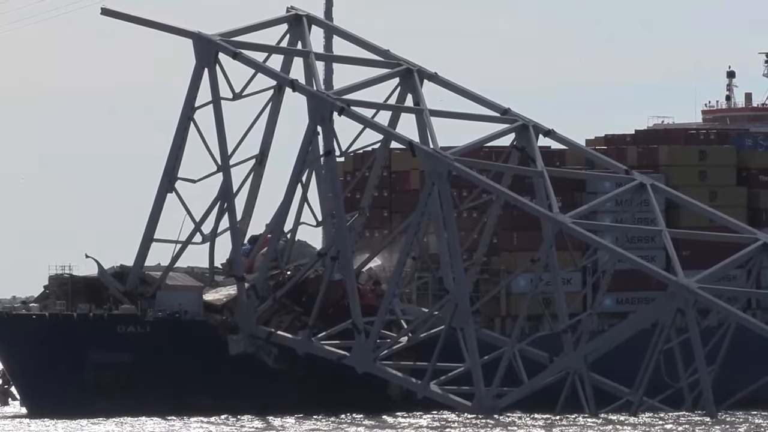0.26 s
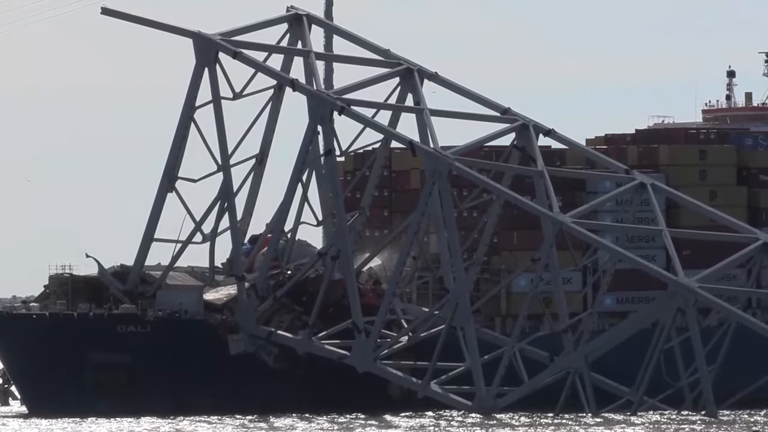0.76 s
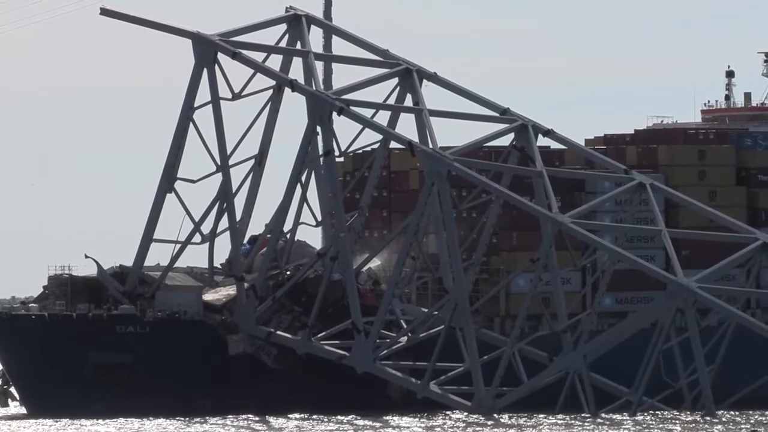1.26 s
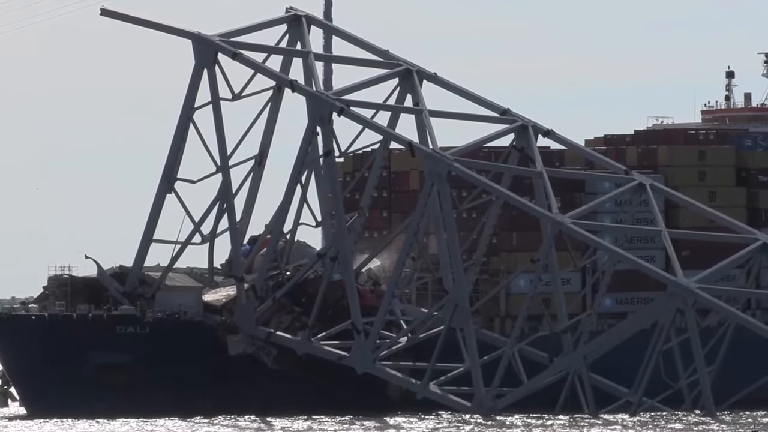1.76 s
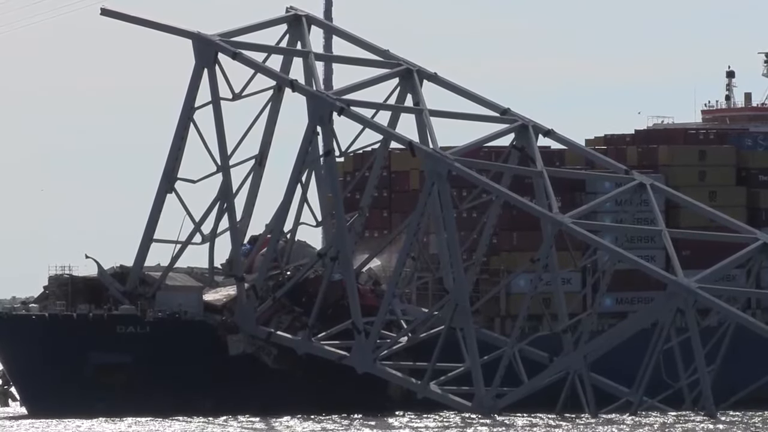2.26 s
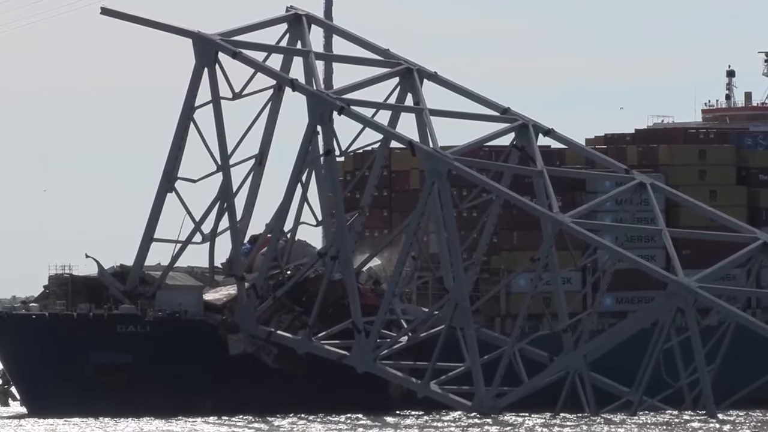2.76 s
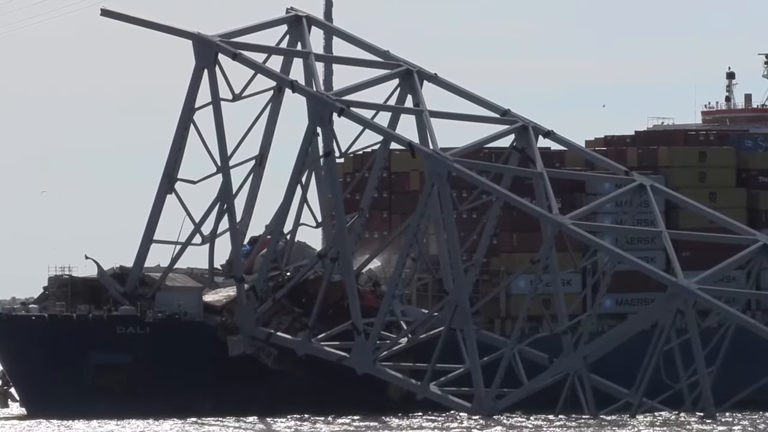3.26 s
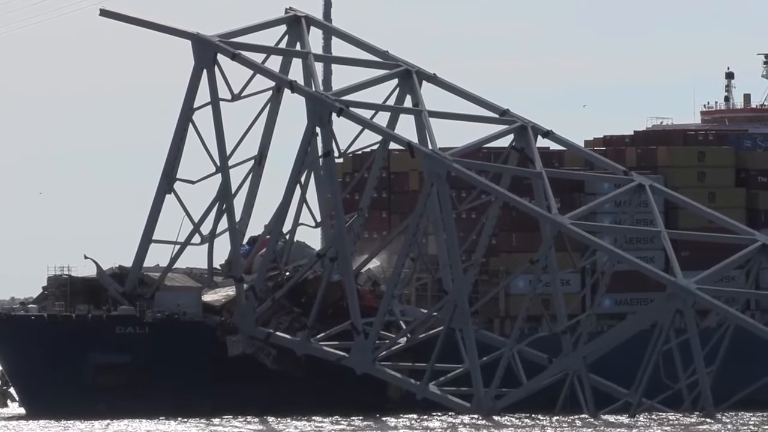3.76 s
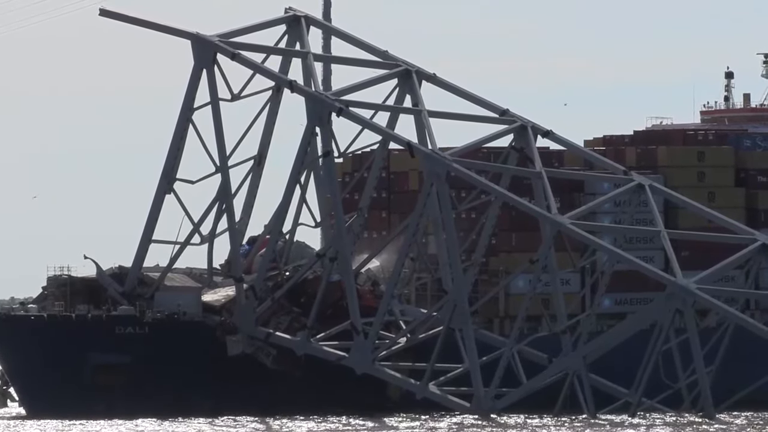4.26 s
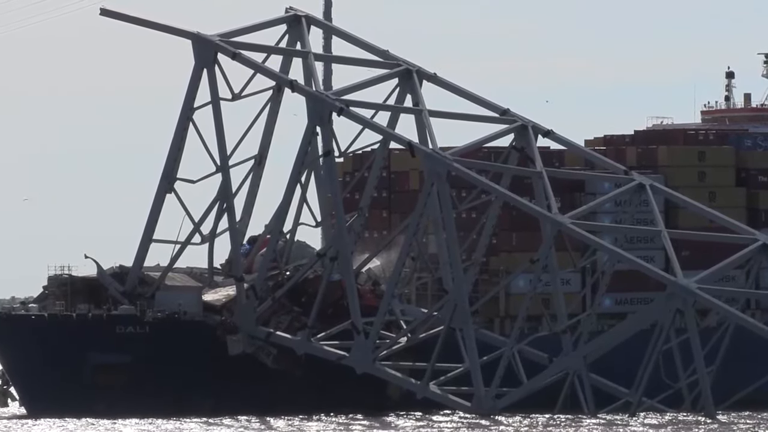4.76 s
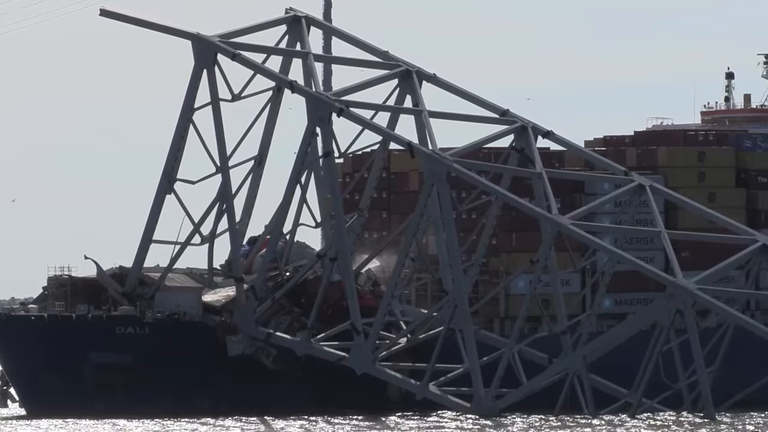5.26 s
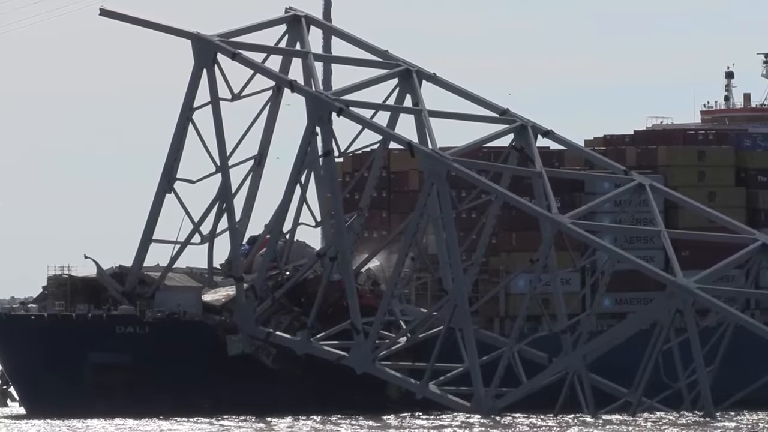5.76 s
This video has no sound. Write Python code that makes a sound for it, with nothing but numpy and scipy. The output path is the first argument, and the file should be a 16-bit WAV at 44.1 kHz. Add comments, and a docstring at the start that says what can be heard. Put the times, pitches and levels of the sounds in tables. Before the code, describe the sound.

Outdoors over open water, a big ship's air horn is already sounding and never stops. The low, buzzing, brassy note is loud and flattened by microphone overload. It creeps up very slightly, then sags a touch near the middle and turns rounder. Air hiss and treble rasp swell briefly now and then, over faint water wash and small low wind bumps.

```python
"""A ship's air horn holds one long blast over open water, loud enough to overload the microphone.
Its pitch creeps up with the air pressure and sags when the pressure eases; brassy partials turn rounder.
Water washes behind it and the horn's air hisses, both as shaped noise; the treble swells now and then.
A light wind bumps the microphone with low noise, in short gusts over an uneven breeze."""
import sys
import numpy as np
from scipy import signal
from scipy.fft import rfft, irfft
from scipy.io import wavfile

SR = 44100
rng = np.random.default_rng(int(sys.argv[2]) if len(sys.argv) > 2 else 0)


def put_to_file(sound):
    """Save the sound as 16-bit audio at rate SR, in the file named by the first command-line argument."""
    columns = np.atleast_2d(sound).T  # one column per channel
    safe = np.clip(columns, -1, 1)
    whole_steps = np.round(safe * 32767)
    wavfile.write(sys.argv[1], SR, whole_steps.astype(np.int16))


N = 265041
TIME = np.arange(N) / SR  # seconds, at every sample
STEPS = np.linspace(0, N / SR, 600)  # seconds, at the slower control steps

# course of the blast, before tone and drive: time_s, pitch_hz, level_db
BLAST_COURSE = [(0.0, 153.8, -11.8), (0.45, 154.33, -11.4), (0.85, 154.57, -11.5), (1.3, 154.85, -10.7),
                (1.5, 155.07, -10.6), (2.27, 155.03, -10.5), (2.85, 154.08, -12.2), (3.45, 154.16, -12.0),
                (4.7, 154.35, -11.9), (4.97, 154.42, -12.9), (5.55, 154.6, -11.1), (6.0, 154.45, -13.0)]


def from_db(db):
    """Decibels to gain."""
    return 10 ** (np.asarray(db) / 20)


def rms_one(x):
    """Scale to rms 1."""
    return x / np.sqrt(np.mean(x ** 2) + 1e-20)


def in_time(rows, times):
    """Each column of a curve, read at the given times."""
    time_s, *columns = np.transpose(rows)
    return [np.interp(times, time_s, column) for column in columns]


def at_hz(points, hz):
    """Read a spectrum in dB along a log-frequency axis."""
    point_hz, db = np.transpose(points)
    return np.interp(np.log(np.maximum(hz, 1)), np.log(point_hz), db)


def drift(rate_hz):
    """Slow random wander at the control steps, rms 1: white noise through two equal low-pass poles."""
    pole = np.exp(-2 * np.pi * rate_hz * STEPS[1])
    slow = signal.lfilter([1], [1, -2 * pole, pole * pole], rng.standard_normal(2 * len(STEPS)))
    return rms_one(slow[len(STEPS):])  # the first half lets the filter settle


def noise(spectrum):
    """Noise of the given colour, rms 1."""
    hz = np.fft.rfftfreq(N, 1 / SR)
    white = rfft(rng.standard_normal(N))
    return rms_one(irfft(white * from_db(at_hz(spectrum, hz)), N))


def bump(centre_s, length_s, edge):
    """A smooth rise and fall of height 1, half as high at the ends of its length; edge steepens it."""
    return .5 ** (np.abs(2 * (STEPS - centre_s) / length_s) ** edge)


def cycles(jitter=0.00035, jitter_hz=14.8):
    """Phase of the horn's diaphragm in radians; its pitch trembles very slightly."""
    pitch_hz, _ = in_time(BLAST_COURSE, STEPS)
    trembling_hz = pitch_hz * (1 + jitter * drift(jitter_hz))
    return 2 * np.pi * np.cumsum(np.interp(TIME, STEPS, trembling_hz)) / SR


def partials(tone, multiples, pitch_hz):
    """Partial levels in dB; above the tone's table they follow the treble of the shock front."""
    # treble of the shock front, on the tone tables' dB scale: frequency_hz, level_db
    front_treble = [(4800, -37.5), (5400, -51.5), (6200, -40.5), (7500, -49.5), (9500, -49), (13000, -56)]
    known, db = np.transpose(tone)
    treble_db = at_hz(front_treble, multiples * pitch_hz)
    return np.where(multiples <= known[-1], np.interp(multiples, known, db), treble_db)


def causal_phase(hz, db, size=4096):
    """Phase of a resonator with this response: a sharp front first, the ringing after it."""
    grid_hz = np.fft.rfftfreq(size, 1 / SR)
    response = from_db(at_hz(np.column_stack([hz, db]), grid_hz))
    cepstrum = irfft(np.log(response))
    # folding the cepstrum onto positive time makes the phase causal
    phase = rfft(2 * cepstrum[:size // 2], size).imag
    return np.interp(hz, grid_hz, phase)


def swells():
    """Treble swells: rise of the hiss and of the horn's rasp in dB, at the control steps."""
    # treble swells: centre_s, length_s, hiss_rise_db, rasp_rise_db
    swell_rows = [(0.3, .16, 2, 1.5), (1.027, 0.26, 5, 1.5), (1.64, 0.27, 6, -0.5), (2.01, 0.13, 7.5, .5),
                  (2.862, 0.27, 8.5, 5), (3.185, 0.13, 13, 2), (3.727, 0.2, 12, 2), (3.96, 0.19, 4, 2),
                  (4.3, .13, 7.5, 0), (4.487, 0.11, 6, 1), (4.768, 0.26, 6, 4.5), (5.046, .2, 5.5, 3.5),
                  (5.758, 0.36, 9, -.5)]
    edge = 2.9
    return sum(np.outer(rise_db, bump(centre_s, length_s, edge))
               for centre_s, length_s, *rise_db in swell_rows)


def horn(turn, drive_db=-0.74, fading_db=3.0, fading_hz=6000, fading_rate_hz=0.5, flutter_db=2.0,
         flutter_rate_hz=8, scatter_rad=2.67, scatter_hz=4500, count=90):
    """The diaphragm lets out one puff a cycle; the bell steepens it into a shock front that rings."""
    # partials while the pressure builds, on the blast's level: multiple, level_db
    building_tone = [(1, 1), (2, -0.5), (3, -9.5), (4, -12), (5, -12), (6, -40.5), (7, -14.5), (8, -12.5),
                     (9, -12.5), (10, -22), (11, -20), (12, -19), (13, -27.5), (14, -21.5), (15, -55.5),
                     (16, -38), (17, -25), (18, -24.5), (19, -26), (20, -47), (21, -24.5), (22, -33),
                     (23, -34), (24, -23), (25, -55.5), (26, -31.5), (27, -47), (28, -44), (29, -50),
                     (30, -45)]
    # partials at full pressure: multiple, level_db
    full_tone = [(1, 1), (2, -2), (3, -9.5), (4, -18.5), (5, -16), (6, -46.5), (7, -17), (8, -15.2),
                 (9, -22), (10, -39.5), (11, -23), (12, -20), (13, -28.5), (14, -32), (15, -48.5),
                 (16, -32.5), (17, -24), (18, -21), (19, -27), (20, -19.5), (21, -19.5), (22, -33.5),
                 (23, -25), (24, -35), (25, -32.5), (26, -28), (27, -40), (28, -29), (29, -25), (30, -35)]
    # partials at eased pressure: multiple, level_db
    eased_tone = [(1, 1.5), (2, -3), (3, -8), (4, -19), (5, -22.9), (6, -45.5), (7, -18), (8, -15.5),
                  (9, -20.5), (10, -36.5), (11, -23), (12, -18), (13, -28.5), (14, -42), (15, -26.5),
                  (16, -29.5), (17, -22.5), (18, -26), (19, -29.5), (20, -23), (21, -23.5), (22, -39.5),
                  (23, -31.5), (24, -30.5), (25, -51), (26, -42.5), (27, -37), (28, -44), (29, -37.5),
                  (30, -38.5)]
    # course of the air pressure: time_s, stage (0 building, 1 full, 2 eased)
    pressure = [(1.02, 0), (1.45, 1), (2.2, 1), (2.72, 2)]
    brass_low_hz, brass_high_hz = 540, 1930
    linger_db, linger_s = 2.5, 0.35
    rasp_hz = 2400  # the swells change the partials above this

    pitch_hz, level_db = in_time(BLAST_COURSE, STEPS)
    stage, = in_time(pressure, STEPS)
    multiples = np.arange(1, count + 1)
    hz = multiples * pitch_hz.mean()
    tones = np.array([partials(tone, multiples, pitch_hz.mean())
                      for tone in (building_tone, full_tone, eased_tone)])
    # each stage of pressure blends into the next
    shares = np.maximum(0, 1 - np.abs(stage - np.arange(len(tones))[:, None]))

    # the brassy middle outlasts the drop in pressure, then settles
    since_eased_s = np.maximum(STEPS - pressure[-1][0], 0)
    brass_db = linger_db * shares[-1] * np.exp(-(since_eased_s / linger_s) ** 2)
    brassy = (hz > brass_low_hz) & (hz < brass_high_hz)
    _, rasp_db = swells()
    partial_db = level_db + tones.T @ shares
    partial_db = partial_db + np.outer(brassy, brass_db) + np.outer(hz > rasp_hz, rasp_db)
    gain = from_db(partial_db)

    # the bell radiates poorly near its cut-off, so the lowest partials lead the front
    lead = 1.5 / multiples ** 4 + .9 / (1 + (multiples / 5) ** 4)
    # reflections off steel and water smear the highest partials over the cycle
    smear = scatter_rad * np.tanh((hz / scatter_hz) ** 3) * rng.standard_normal(count)
    phase = causal_phase(hz, tones.mean(axis=0)) + lead + smear

    blast = np.zeros(N)
    for multiple, partial_hz, partial_gain, partial_phase in zip(multiples, hz, gain, phase):
        # moving air makes each partial fade slowly and flutter, the high ones most
        wander_db = fading_db * drift(fading_rate_hz) + flutter_db * drift(flutter_rate_hz)
        fade = from_db(np.tanh(partial_hz / fading_hz) * wander_db)
        level = np.interp(TIME, STEPS, partial_gain * fade)
        blast += level * np.cos(multiple * turn + partial_phase)
    return np.sqrt(2) * from_db(drive_db) * blast  # sqrt(2) turns rms levels into peaks


def air_hiss(turn):
    """Fine air hiss of the horn: bright noise that swells, flickers and throbs at its pitch."""
    # colour of the hiss: frequency_hz, relative_db
    hiss_colour = [(1500, -11), (3000, -9.5), (6500, -2.5), (9000, -4.5), (12000, -8), (15000, -11.5)]
    # level of the hiss between swells: time_s, level_db
    hiss_level = [(0.0, -38.5), (1.3, -41.5), (2.7, -41), (3.1, -50), (3.5, -49), (4.2, -44), (5.2, -41),
                  (6.0, -49)]
    flicker_db, flicker_hz = 2, 7.3
    throb_db, throb_lag = 2, 0.19  # depth; lag behind the horn's phase in cycles

    hiss_rise_db, _ = swells()
    hiss_db = in_time(hiss_level, STEPS)[0] + hiss_rise_db + flicker_db * drift(flicker_hz)
    throbbing_db = throb_db * np.cos(turn - 2 * np.pi * throb_lag)
    return from_db(np.interp(TIME, STEPS, hiss_db) + throbbing_db) * noise(hiss_colour)


def water():
    """A broad wash of shaped noise; its level follows a share of the rasp's swells."""
    # colour of the wash: frequency_hz, relative_db
    wash_colour = [(120, 0), (200, 11.5), (290, -1), (550, -1.5), (730, 3), (950, -2), (1700, 2),
                   (2350, -1.5), (3100, 3.5), (3700, -4.5), (5000, -8), (6500, -15), (9000, -27),
                   (13000, -33)]
    level_db, follows = -33, 0.4  # level between swells; share of the rasp's swell

    _, rasp_rise_db = swells()
    wash_gain = from_db(np.interp(TIME, STEPS, level_db + follows * rasp_rise_db))
    return wash_gain * noise(wash_colour)


def wind():
    """Low lumps of turbulence at the microphone: short gusts over an uneven breeze."""
    # colour of the wind at the microphone: frequency_hz, relative_db
    wind_colour = [(15, -17.5), (35, 5.5), (65, 5.5), (110, -2), (200, -10.5), (400, -59)]
    # gusts on the microphone, before the breeze joins: centre_s, length_s, peak_db
    gust_rows = [(0.02, 0.088, -23), (0.113, 0.033, -31), (0.26, .14, -35), (0.52, .1, -32),
                 (0.76, .1, -34), (1.05, .06, -35), (1.57, .07, -33), (2.0, .08, -35), (2.49, .14, -29),
                 (2.784, .08, -37), (3.455, 0.099, -33), (3.62, .05, -35), (4.27, .06, -27),
                 (4.813, .08, -30), (5.26, 0.055, -32), (5.35, .05, -35)]
    breeze_db, swing_db, breeze_hz = -45.5, 3.5, 2.4  # the light air between gusts
    edge = 1.8

    breeze = from_db(breeze_db + swing_db * drift(breeze_hz))
    gusts = sum(from_db(peak_db) * bump(centre_s, length_s, edge)
                for centre_s, length_s, peak_db in gust_rows)
    return np.interp(TIME, STEPS, np.hypot(breeze, gusts)) * noise(wind_colour)


def scene():
    """Horn, its air hiss, water and wind at one microphone."""
    turn = cycles()
    return (horn(turn) + air_hiss(turn) + water() + wind())[None]


def record(dry):
    """The input flattens every crest, which chops the hiss at the horn's pitch; offset and top are cut."""
    overload, hardness = .478, 16  # ceiling in full scale; sharpness of its knee
    cutoff_hz = 15030
    fine = signal.resample_poly(dry, 2, 1, axis=-1)  # double rate keeps the clipping clean
    flat = fine / (1 + np.abs(fine / overload) ** hardness) ** (1 / hardness)
    low_pass = signal.firwin(601, cutoff_hz, fs=2 * SR)
    return signal.resample_poly(flat - flat.mean(), 1, 2, axis=-1, window=low_pass)


dry = scene()
out = record(dry)
put_to_file(out)
```